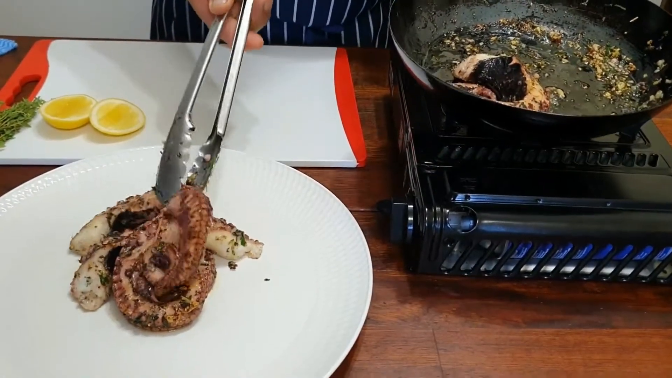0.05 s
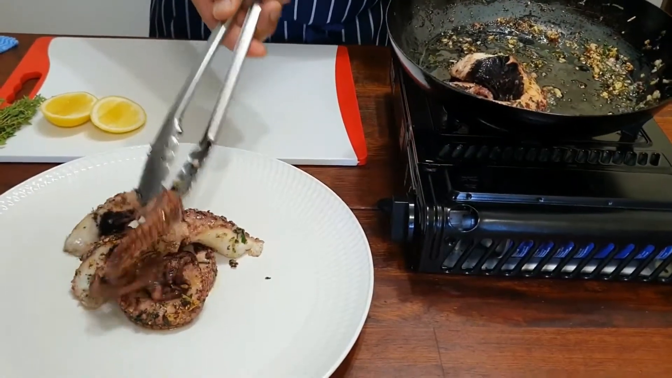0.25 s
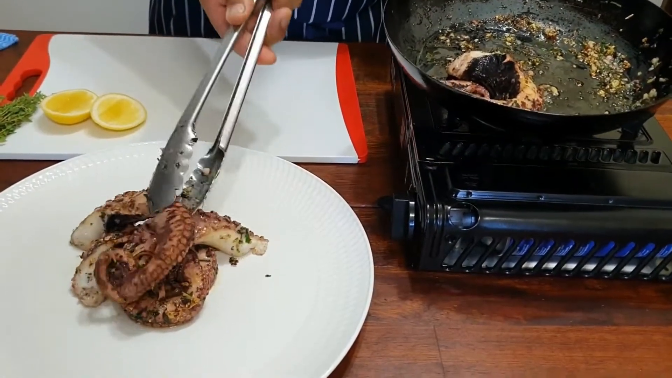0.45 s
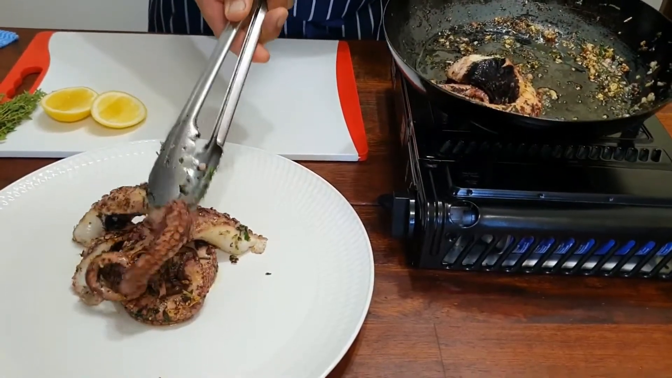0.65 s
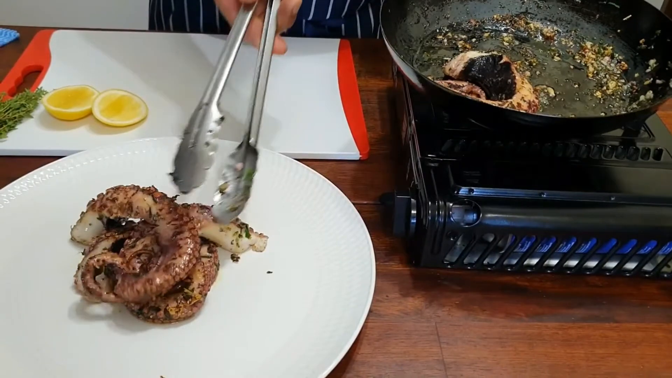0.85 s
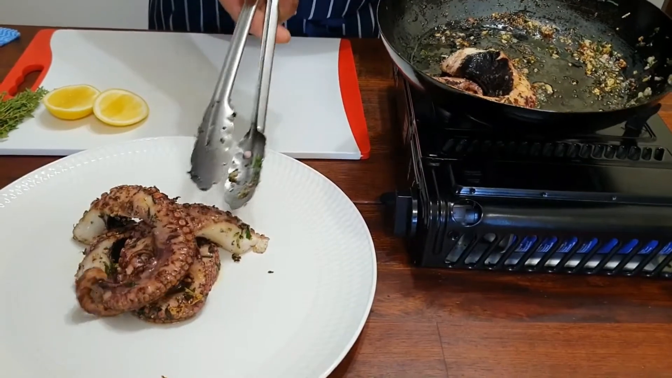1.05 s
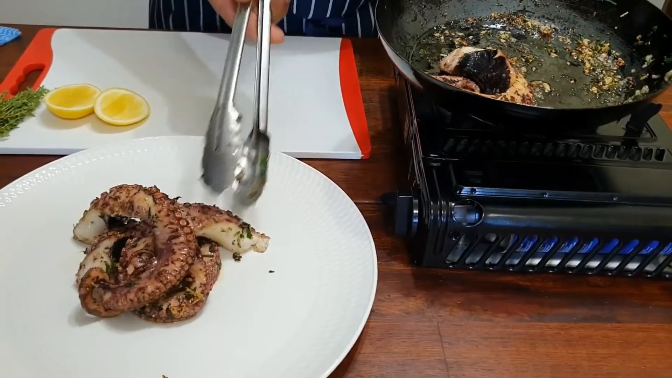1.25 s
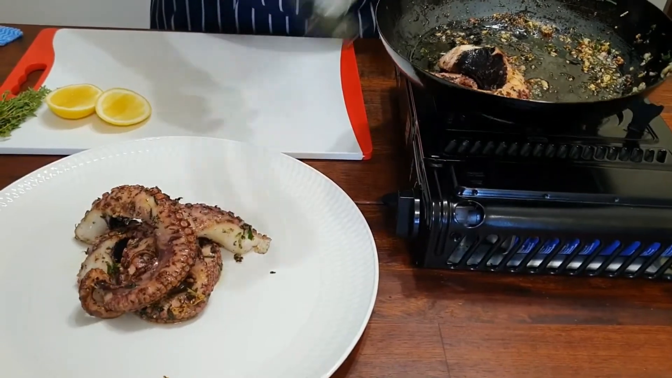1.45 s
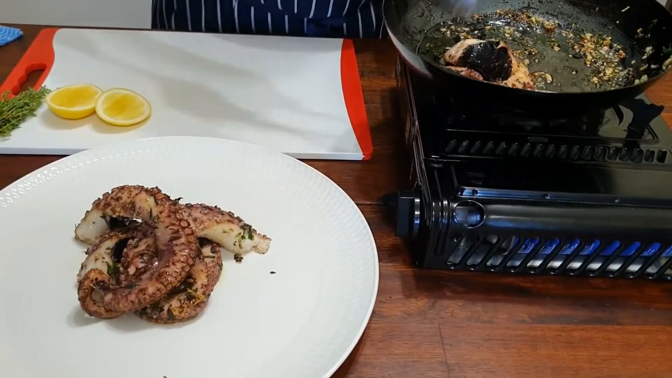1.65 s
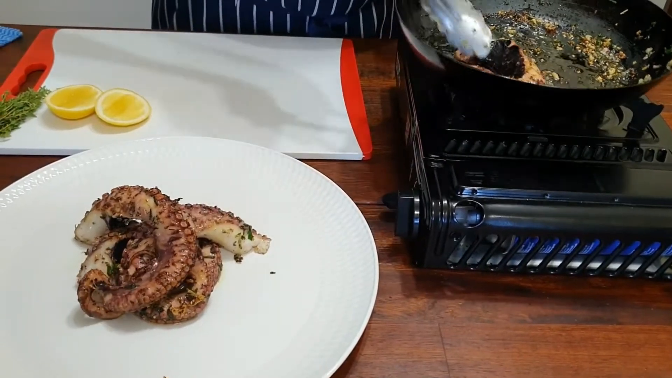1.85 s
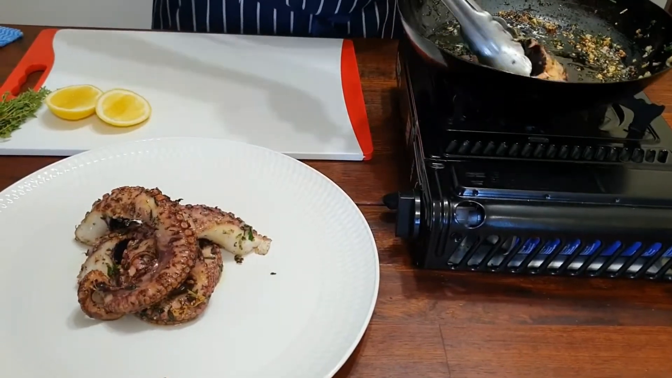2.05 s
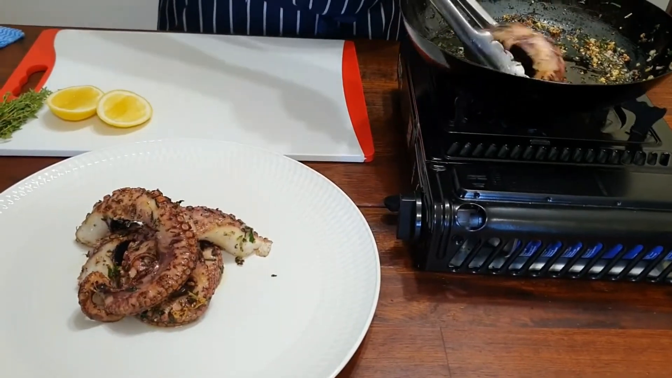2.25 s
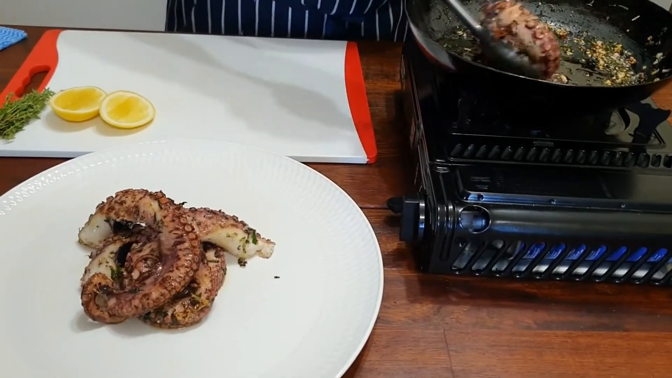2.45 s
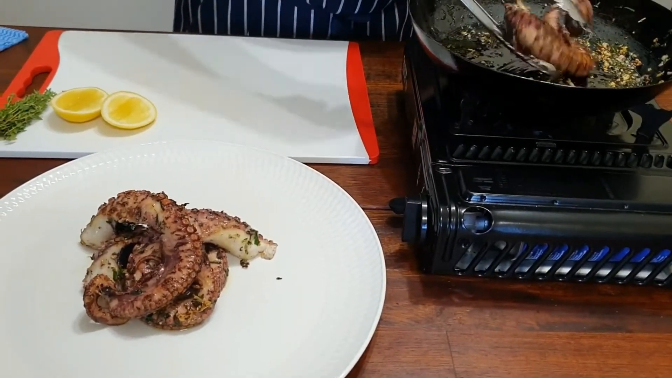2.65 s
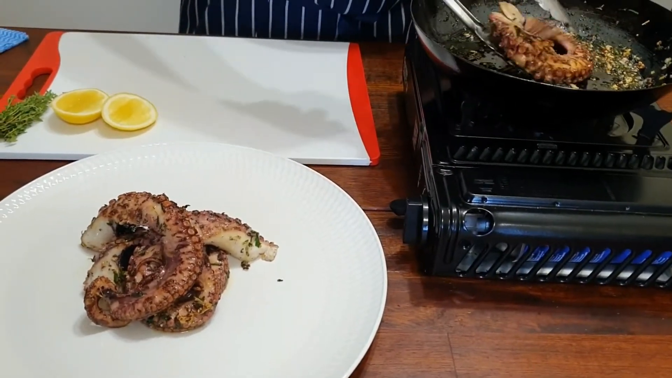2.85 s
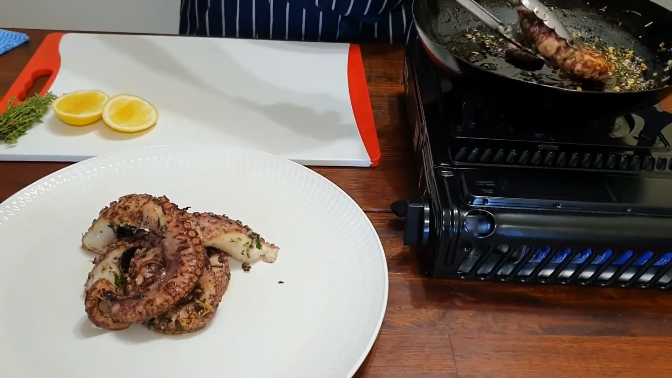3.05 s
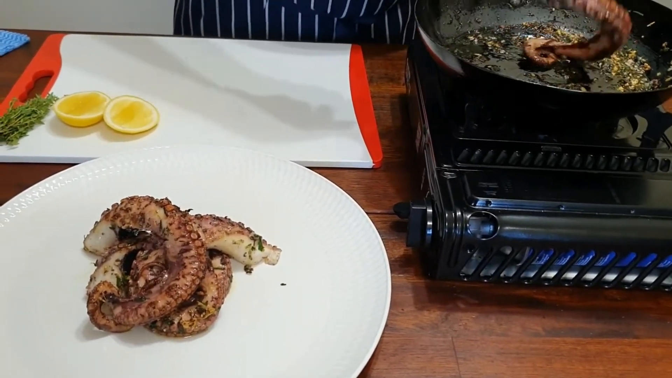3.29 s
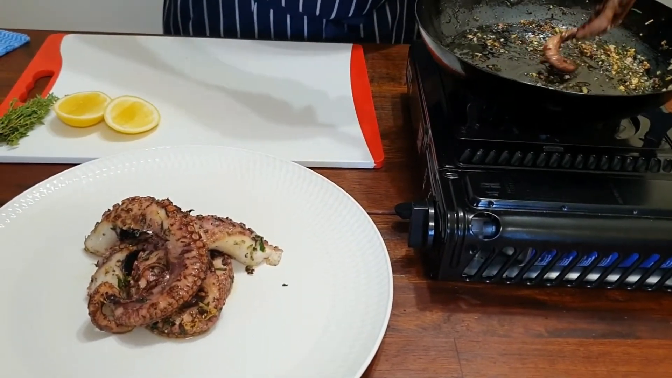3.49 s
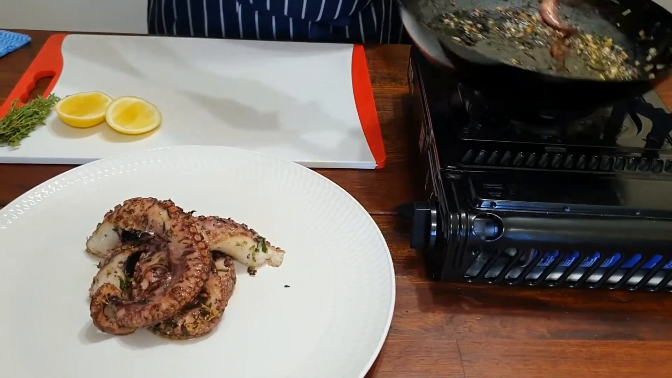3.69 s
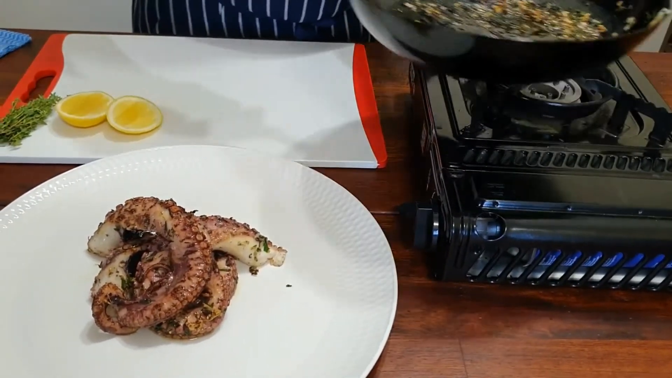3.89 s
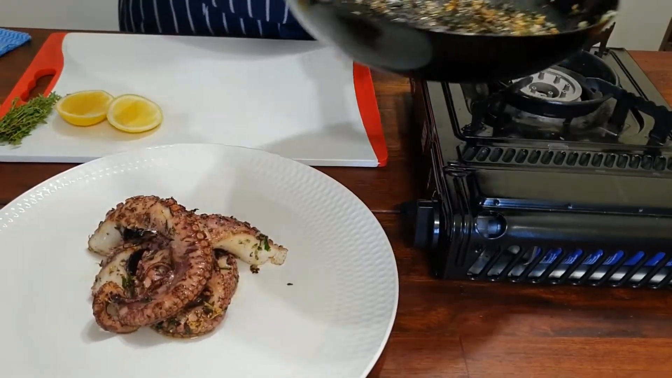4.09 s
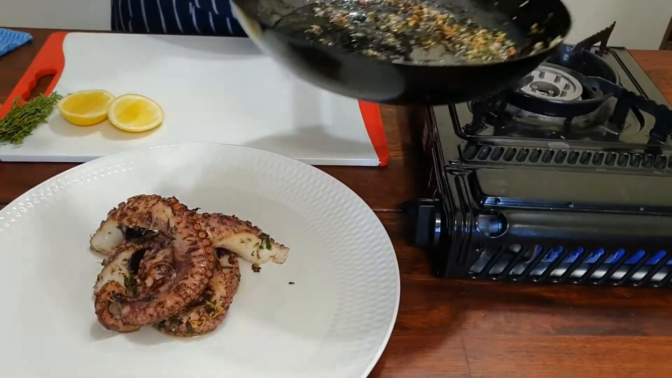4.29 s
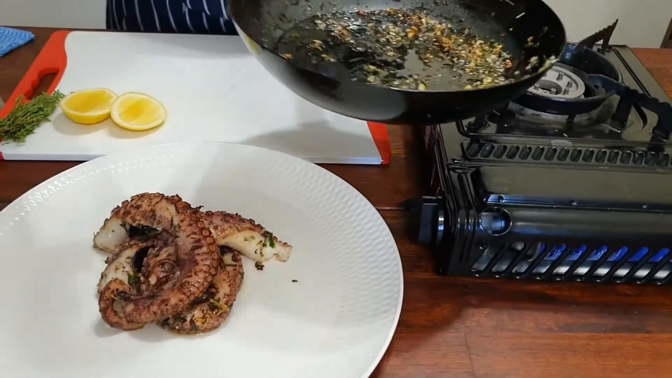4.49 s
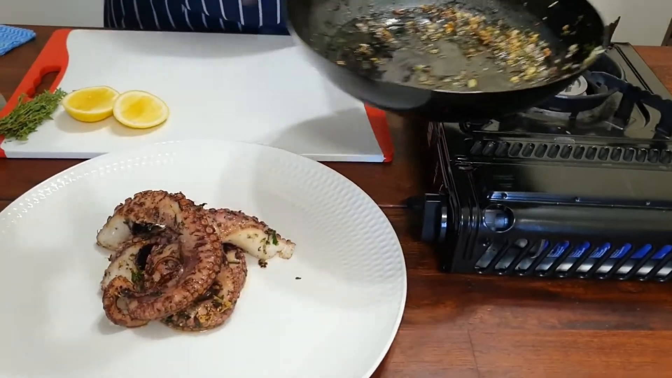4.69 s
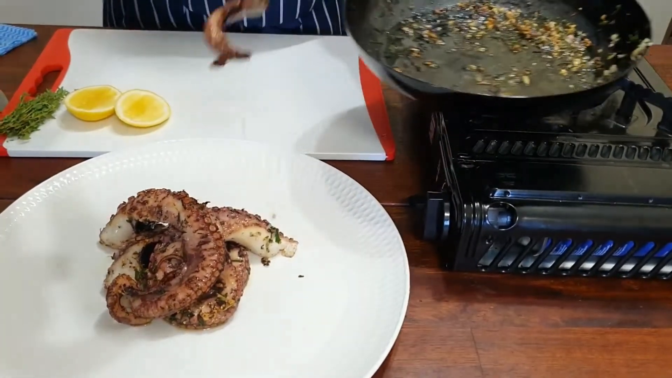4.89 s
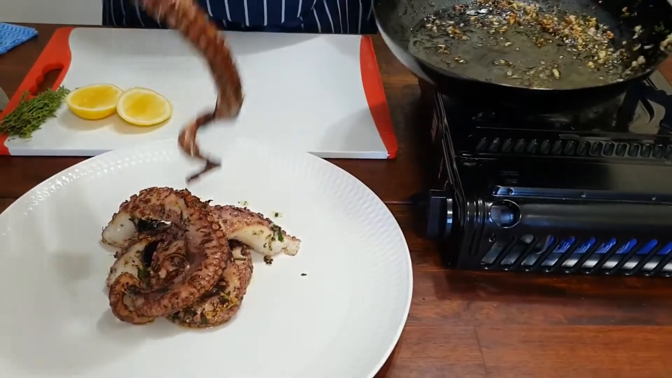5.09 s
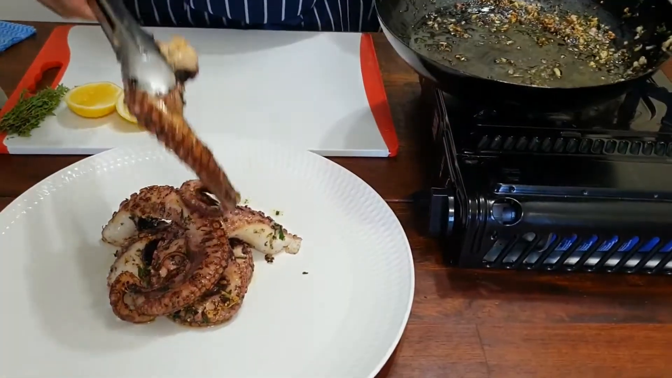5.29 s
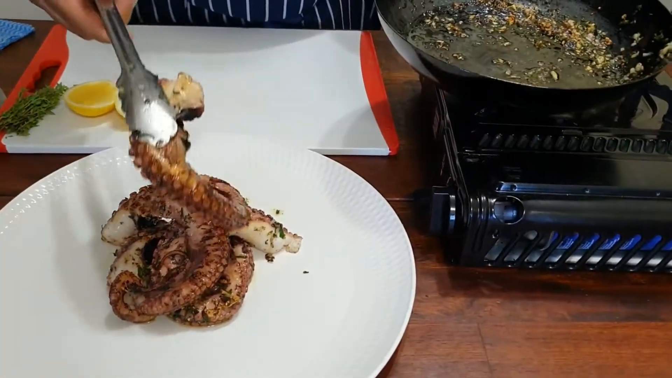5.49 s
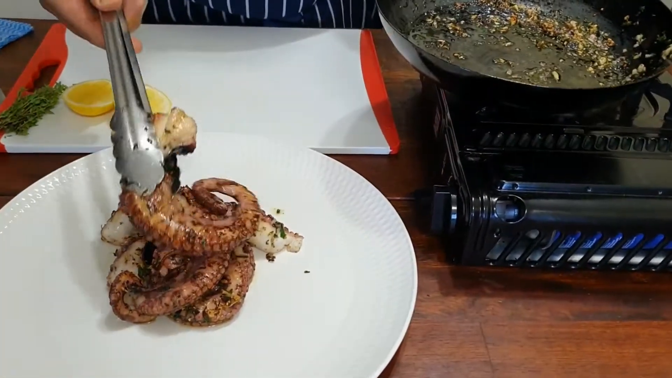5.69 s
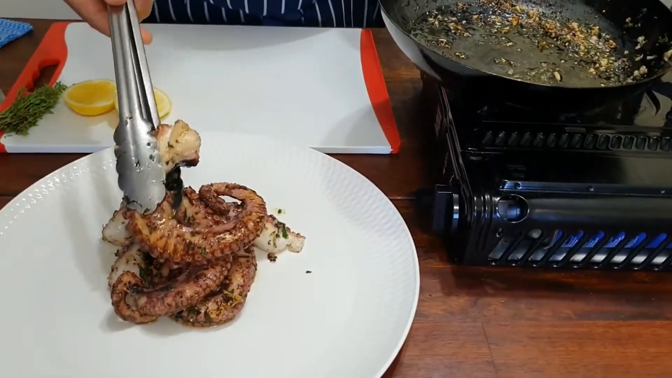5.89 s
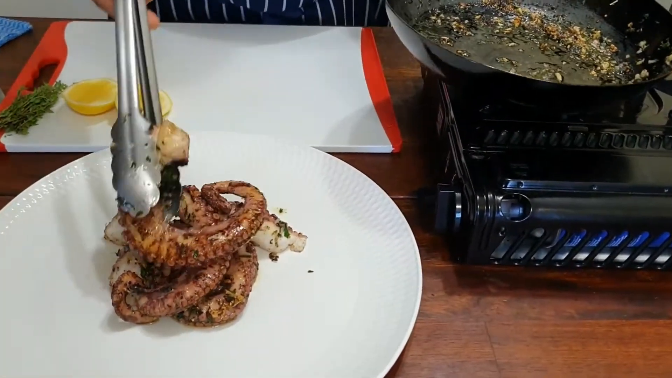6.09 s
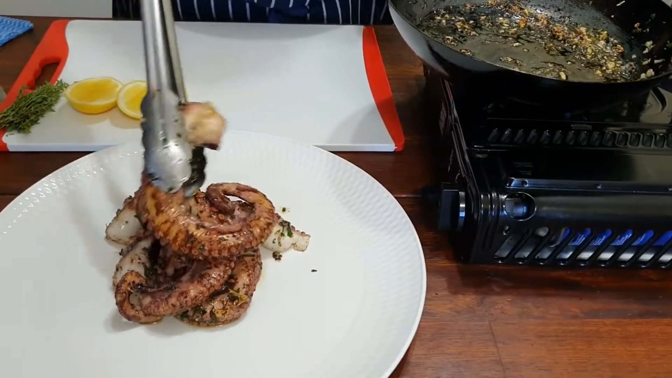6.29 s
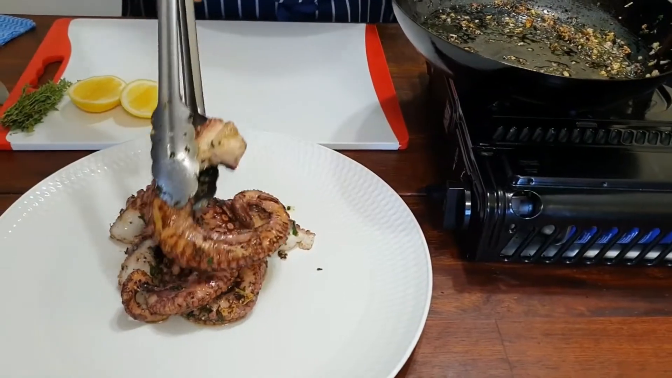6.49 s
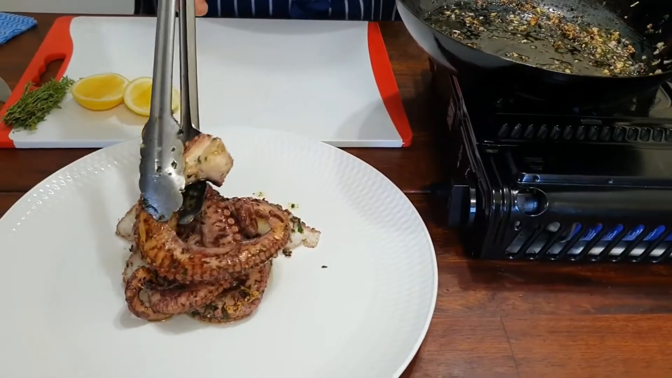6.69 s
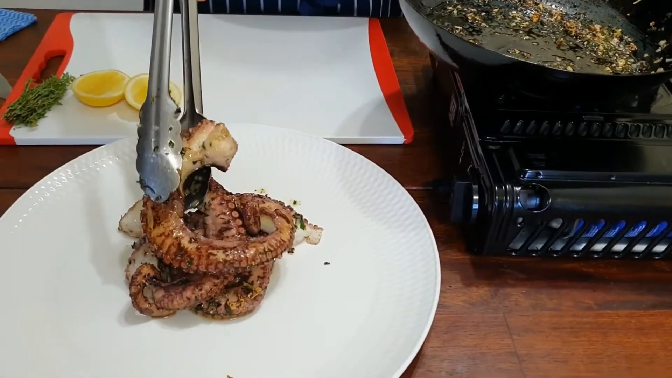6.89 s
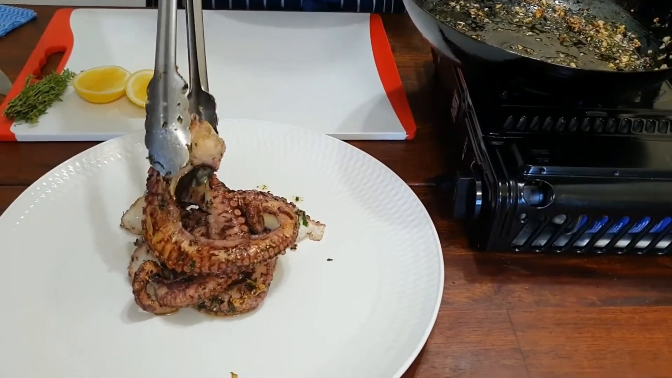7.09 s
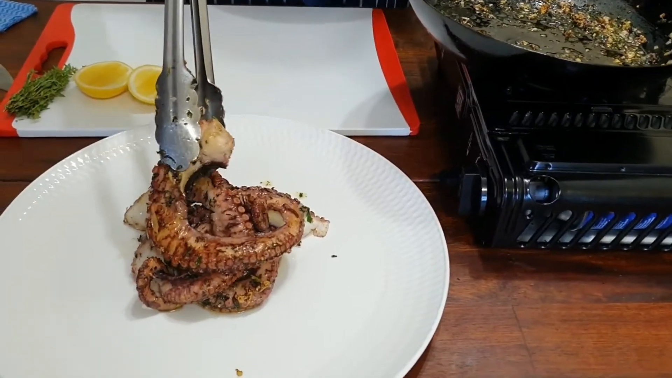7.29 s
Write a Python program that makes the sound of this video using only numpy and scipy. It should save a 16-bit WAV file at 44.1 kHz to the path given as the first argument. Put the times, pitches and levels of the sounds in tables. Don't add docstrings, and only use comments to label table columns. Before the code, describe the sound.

A close stereo pickup in a hard-walled kitchen, with soft steady air noise and a faint low engine drone that grows from about 2 s. At first almost nothing: a tiny oil spit and hiss at 0.2-0.5 s and a dull pan shift at 0.8. At 1.65 the pan tips with a muffled clunk and bounces. At 1.92-2.0 comes a bright, hard double clack of steel tongs on the pan, ringing with a deep gong, then small bounces. Scraping and faint sizzle follow to 2.4 as food is gripped. Light taps at 2.77 and tiny ticks at 3.03-3.06. At 3.63 a clunk as the pan lifts, then short scrapes near 3.75. Quiet, with faint hiss, until a loud ringing clank at 5.1 and a lesser one at 5.23, settling. A barely audible hinge squeak at 6.0, a duller rocking knock at 6.25, then soft creaks and wavering gong hum until about 7.3.

```python
import sys
import numpy as np
from scipy import signal
from scipy.fft import rfft, irfft, next_fast_len
from scipy.io import wavfile
from scipy.ndimage import uniform_filter1d

SR = 44100
rng = np.random.default_rng(int(sys.argv[2]) if len(sys.argv) > 2 else 0)


def undo_db(level):
    steps = np.asarray(level, float) / 20
    return 10 ** steps


def wrap_up_sound(samples):
    columns = np.atleast_2d(samples).T
    tamed = np.clip(columns, -1, 1)
    steps = np.round(tamed * 32767).astype(np.int16)
    wavfile.write(sys.argv[1], SR, steps)


N = 324039

# [t/s, middle/dB, gong/dB, bright/dB, thud/dB]
SPITS = [
    (.238, -68, -85, -57, -79),
    (.252, -80, -85, -78, -63),
]
# [t/s, middle/dB, gong/dB, bright/dB, thud/dB]
SHIFTS = [
    (0.82, -44.5, -68, -90, -47),
]
# [t/s, middle/dB, gong/dB, bright/dB, thud/dB]
TIPS = [
    (1.642, -44, -70, -63, -72),
    (1.648, -30, -60.5, -52, -39),
    (1.666, -35.5, -62, -72, -48),
    (1.691, -47, -67, -73, -60),
]
# [t/s, middle/dB, gong/dB, bright/dB, thud/dB]
CLACKS = [
    (1.918, -21.5, -26, -26.5, -47),
]
# [t/s, middle/dB, gong/dB, bright/dB, thud/dB]
GRAZES = [
    (1.9526, -26.5, -52, -52.5, -61),
    (1.9548, -18, -54.5, -50.5, -65),
]
# [t/s, middle/dB, gong/dB, bright/dB, thud/dB]
KNOCKS = [
    (1.9552, -19.5, -40, -43, -60),
    (1.977, -35, -47, -52, -69),
    (1.992, -34.5, -47, -49, -68),
    (2.017, -35, -53, -49, -70),
    (2.174, -47, -67, -56, -72),
]
# [t/s, middle/dB, gong/dB, bright/dB, thud/dB]
GRIPS = [
    (2.314, -41.5, -68, -41.5, -76),
    (2.321, -43.5, -51.5, -58, -76),
]
# [t/s, middle/dB, gong/dB, bright/dB, thud/dB]
TAPS = [
    (2.772, -36.5, -43.5, -49.5, -71),
    (2.778, -37.5, -56, -72, -59),
]
# [t/s, middle/dB, gong/dB, bright/dB, thud/dB]
NUDGES = [
    (3.025, -54, -73, -68, -71),
    (3.034, -45.5, -57, -76, -76),
]
# [t/s, middle/dB, gong/dB, bright/dB, thud/dB]
TICKS = [
    (3.055, -50.5, -44.5, -42.5, -71),
    (3.063, -63, -64, -46.5, -76),
]
# [t/s, middle/dB, gong/dB, bright/dB, thud/dB]
LIFTS = [
    (3.628, -31.5, -40.5, -78, -41),
]
# [t/s, middle/dB, gong/dB, bright/dB, thud/dB]
CATCHES = [
    (3.733, -48, -70, -72, -62),
    (3.744, -41, -70, -70, -62),
    (3.758, -40, -70, -70, -68),
]
# [t/s, middle/dB, gong/dB, bright/dB, thud/dB]
SETS = [
    (5.1, -21, -29, -36, -34),
    (5.103, -29, -48, -46, -55),
    (5.118, -41, -51, -56, -59),
    (5.137, -44, -60, -61, -63),
]
# [t/s, middle/dB, gong/dB, bright/dB, thud/dB]
RESETS = [
    (5.226, -30.5, -34, -44.5, -45.5),
    (5.234, -37, -56, -71, -54),
    (5.245, -40, -60, -66, -64),
    (5.359, -54, -70, -73.5, -78),
]
# [t/s, middle/dB, gong/dB, bright/dB, thud/dB]
ROCKS = [
    (6.253, -27.5, -31, -58, -40),
    (6.263, -44, -44, -72, -36),
    (6.329, -38, -60, -88, -44.5),
    (6.369, -49, -65, -93, -61),
]

# [f/Hz, level/dB, t60/s]
SHIFTED = [(735, 5.5, .1), (930, 6, .1), (1210, -27, .1), (1630, -20, .08)]
# [f/Hz, level/dB, t60/s]
TIPPED = [(750, -2.5, .3), (893, 3, .3), (1163, 2.5, .2), (1297, -2.5, .3), (1630, -3.5, .3),
          (2065, -13, .2), (2680, -10, .3), (2870, -9, .4), (3225, -20, .4), (4657, -35, .2)]
# [f/Hz, level/dB, t60/s]
TONGS = [(1030, -10, .1), (1438, -2, 0.21), (1794, 0, 0.28), (2100, -8, 0.12), (2490, 0, 0.073),
         (3250, -10, 5.0), (3740, -2, 0.037), (5539, -22, 1.8), (5740, -7, 0.31), (6460, -21, 0.13),
         (7300, -11.5, 0.065), (7370, -5, 5.0),
         (5537, -5, .3)]
# [f/Hz, level/dB, t60/s]
BOWL = [(824, -0.5, 0.029), (1010, 8, 0.026), (1755, 0, 0.048), (2350, 0.5, 0.034)]
# [f/Hz, level/dB, t60/s]
PAN = [(540, -3, .3), (819, -5, .4), (1012, 1, .8), (1222, -7, .9), (935, -3, .4), (1402, -7, .6),
       (1529, -8, .26), (1773, -7, .3), (2285, -7, .25), (2540, -8, .4), (2832, -8, .4), (3085, -12, .32),
       (3424, -16, .6), (4317, -22, .5)]
# [f/Hz, level/dB, t60/s]
DUG = [(640, -5, .2), (1012, 1, .2), (1150, 4, .2), (1222, 1, .2), (1500, -11, .2), (1900, -8, .2),
       (2540, -3, .2), (3000, -13, .2), (3520, -8, .2)]
# [f/Hz, level/dB, t60/s]
JAWS = [(1003, -11, .2), (1186, 8.5, .2), (2020, 1.5, .1), (2570, 1.5, .27), (2754, 1, .2), (5600, 2, .2),
        (6700, -10, .15), (7400, -6, .3)]
# [f/Hz, level/dB, t60/s]
WALL = [(712, -1.5, 0.34), (830, -28, 5.0), (1290, -13, 0.57), (1276, -14, 0.61), (1770, 7, 0.13),
        (1696, 0.5, 5.0), (2140, -20, 0.36), (2330, -4, 0.1), (3300, 1.5, 0.067)]
# [f/Hz, level/dB, t60/s]
FLOOR = [(645, -6, .3), (785, 2, .3), (1000, -13, .2), (1180, 7.5, .3), (1297, 5, .2), (1590, -8, .2),
         (1834, -6, .3), (3330, -10, .2)]
# [f/Hz, level/dB, t60/s]
TIPS_RING = [(1230, -2, .15), (6100, 3.5, 0.054), (7300, -2, .04), (7900, -1, .05)]
# [f/Hz, level/dB, t60/s]
LIFTED = [(664, -15, .2), (976, 5, 0.1), (1120, -4, 0.2), (1290, -6, .3), (1786, 0, 0.2), (2280, -15, 0.2)]
# [f/Hz, level/dB, t60/s]
SCRAPED = [(524, 1, .3), (725, -11, .2), (946, -3, .3), (1260, -3, .3), (1530, -2, .2), (1725, 6, .2),
           (2080, -5, .2), (2430, -13, .2), (2900, -8, .2), (4300, -16, .2)]
# [f/Hz, level/dB, t60/s]
GRATE = [(538, -6, .3), (776, 5, .22), (866, -1, .22), (929, -3, .3), (1217, -6, .4), (1314, -2, .3),
         (1655, -8, .3), (1730, -3, .25), (1870, -8, .25), (3060, -13, .3), (2505, -5, .45),
         (2826, -11, .25), (3700, -14, .2), (5480, -27, .4)]
# [f/Hz, level/dB, t60/s]
ROCKED = [(780, -14.5, 0.54), (930, 6, 0.31), (1040, -14, 0.26), (1480, -17, 0.31), (1673, -3, 0.23),
          (1830, 0, 0.032), (2110, -3, .15), (2290, -5, 0.2), (2500, -6, 0.34), (2730, -8.5, 0.096),
          (3200, -14, 0.043), (3760, -14, 0.21)]
# [f/Hz, level/dB, t60/s]
CREAKING = [(820, -1, 1.), (940, -5, .3), (1259, 0, .3), (1787, -1, .4), (2100, -12, .3), (3280, -13, .3),
            (3850, -24, .1), (4550, -22, .1), (6960, -34, .1)]
# [f/Hz, level/dB, t60/s]
GONG = [(386.5, 2, 0.82), (388, -8, 0.2)]

# [peak t/s, rise/s, fall/s, middle/dB, bright over middle/dB]
SLIDES = [
    [(1.72, 0.025, 0.034, -43, -46), (1.86, 0.14, 0.82, -51, -13.5)],
    [(2.05, 0.024, 0.16, -36, -13.5)],
    [(2.15, 0.089, 0.065, -41.5, -8), (2.21, 0.046, 0.065, -47.5, -29), (2.275, 0.053, 0.024, -44.5, -11.5),
     (2.3, 0.016, 0.023, -42.5, -14)],
    [(2.33, 0.02, 0.028, -43, -15), (2.355, .02, 0.039, -47, -17), (2.41, 0.038, 0.02, -58.5, 5.5)],
    [(2.739, 0.085, 0.12, -65, -4)],
    [(3.08, 0.04, 0.048, -45, -21), (3.12, .02, .04, -53.5, -20)],
    [(3.75, 0.08, 0.044, -43, -19.5), (3.8, 0.029, 0.05, -62, -14), (3.98, 0.13, 0.24, -69, -8)],
    [(5.285, 0.027, 0.074, -43, -45), (5.37, 0.023, 0.31, -66, -23)],
    [(6.36, 0.016, 0.06, -64, -39), (6.52, 0.075, 0.45, -61, -12), (6.64, 0.064, 0.1, -60, -8),
     (6.74, 0.079, 0.15, -63.5, -1.5), (6.9, 0.089, 0.099, -66.5, -3.5),
     (7.107, 0.061, 0.052, -61.5, -10.5), (7.18, 0.05, 0.096, -68, -4.5)],
]
SLIDE_CLEAR_DB = [-4, 0, 7, 1, -3, -2, -4, 5, 5]
# [peak t/s, rise/s, fall/s, level/dB]
SIZZLE = [
    (.27, 0.022, .08, -74),
    (.43, 0.035, 0.16, -65),
    (2.2, 0.23, .15, -54),
    (2.422, 0.058, 0.54, -62),
    (4.87, 0.12, 0.49, -63.5),
    (5.8, 0.11, 0.23, -76),
]
# [peak t/s, rise/s, fall/s, level/dB]
SWELLS = [(1.72, .03, 0.081, -57.5), (1.905, .04, 0.022, -54), (2.11, .06, 0.022, -43.5),
          (2.167, .03, 0.03, -42), (2.225, .03, 0.023, -60), (2.371, .06, 0.057, -46),
          (2.529, .05, 0.023, -63), (2.73, .04, 0.16, -59), (3.09, .05, 0.1, -62), (3.84, .06, 0.078, -61),
          (3.96, .07, 0.14, -65), (5.3, 0.081, 0.047, -52), (5.49, .09, 0.23, -65), (6.385, .03, 0.02, -59),
          (6.499, .06, 0.083, -54), (6.643, .05, 0.073, -50.5), (6.731, .05, 0.085, -55),
          (6.9, .04, 0.086, -53), (7.111, .05, 0.037, -63), (7.19, .04, 0.11, -64.5)]
# [t/s, length/s, f/Hz, width/Hz, level/dB]
SQUEAK = (6.02, 0.22, 3950, 130, -80)
# [t/s, f/Hz, level/dB]
DRONE = [(0, 75.7, -90), (1.6, 71.4, -70.5), (2.6, 70.5, -61), (2.95, 80, -63), (3.4, 76.8, -69),
         (3.7, 78.7, -59), (4.15, 76, -56), (4.45, 72.4, -63.5), (4.8, 82, -63), (5.2, 66.3, -61),
         (5.7, 83.8, -64.5), (7.35, 86, -63)]
# [f/Hz, level/dB]
AIR = [(76, -4), (130, -2), (155, -3), (172, -37), (201, -3.5), (344, -2.5), (372, -5.5), (436, -5.5),
       (637, -6), (928, -5.5), (1070, -6), (1950, -11.5), (2500, -15.5), (3310, -17.5), (13000, -25.5),
       (15000, -23)]
# [t/s, level/dB]
AIR_SWELL = [(0, 1), (.6, -0.5), (1.2, 0.5), (2.6, 3), (3.4, 4.5), (4, 1.5), (4.6, 1.5), (5.6, 0.5),
             (6.1, 1), (6.6, 6.5), (7.35, -1.5)]
# [f/Hz, likeness/1]
SAME = [(60, 1), (150, 0.87), (370, 0.84), (930, -0.11), (2330, 0.17), (5810, -0.048), (14500, 0.083)]
# [f/Hz, t60/s]
KITCHEN = [(100, 0.036), (400, 0.49), (1000, 0.37), (3000, 0.37), (8000, 0.41), (14000, 0.2)]
TABLE_LAG = (19, 31)
# [f/Hz, level/dB]
LOW_CUT = [(45, -14), (75, 10), (110, 0)]
# [f/Hz, level/dB]
RECORDER_TREBLE = [(3000, 0), (6000, -2), (8300, -2), (9000, -8.5), (10500, -5.5), (12000, -6), (14300, -10.5),
                   (14900, -28)]

LEAD = 400
SOFT_S = .0012
FLUTTER_S = 0.01195
FIRM = .3
VALLEY_DB, CLUSTER = -10, .075
TOP_HZ = 4700
WEAK_DB, TILT_DB = 16, 5


def evened(x):
    return x / np.sqrt(np.mean(x ** 2) + 1e-20)


def read(points, hz):
    f, value = np.transpose(points)
    return np.interp(np.log(hz + 1), np.log(f + 1), value)


def coloured(x, points):
    size = next_fast_len(x.shape[-1])
    gain = undo_db(read(points, np.fft.rfftfreq(size, 1 / SR)))
    return irfft(rfft(x, size) * gain, size)[..., :x.shape[-1]]


def levelled(x):
    z = rfft(x)
    fine, broad = (uniform_filter1d(abs(z) ** 2, size=bins, axis=-1) for bins in (80, 1500))
    return irfft(z * np.sqrt(broad / (fine + 1e-30)), x.shape[-1])


def resonate(x, hz, width):
    turn = np.exp(2j * np.pi * np.cumsum(hz * np.ones(x.shape[-1])) / SR)
    r = np.exp(-np.pi * width / SR)
    return 2 * (turn * signal.lfilter([1 - r], [1, -r], x / turn)).real


def add(mix, s, sound):
    part = mix[round(s * SR):][:len(sound)]
    part += sound[:len(part)]


def air():
    frames, hz = N // 256 + 5, np.fft.rfftfreq(1024, 1 / SR)
    a, b, c, d, patches = rng.standard_normal((frames, 513, 5)).T
    patches = evened(uniform_filter1d(uniform_filter1d(patches, size=12, axis=0), size=14, axis=1))
    same = np.clip(read(SAME, hz), -1, 1)[:, None]
    left = a + 1j * b
    z = np.array([left, same * left + np.sqrt(1 - same ** 2) * (c + 1j * d)])
    s, db = np.transpose(AIR_SWELL)
    swell_db = np.interp(np.arange(frames) * 256 / SR, s, db - np.mean(db))
    share = np.where(hz < 4000., 1, .35)[:, None]
    z *= undo_db(read(AIR, hz)[:, None] + .7 * patches + swell_db * share)
    return undo_db(-61.5) * evened(signal.istft(z, nperseg=1024, noverlap=768)[1][:, :N])


def rumble():
    s, engine_hz, engine_db = np.transpose(DRONE)
    t = np.arange(N) / SR
    noise = rng.standard_normal((N, 4, 2)).T
    noise[1] = noise[0] + [[.6], [.35], [.3], [.35]] * noise[1]
    lines = [(-73, 36., 46.0),  # level/dB, f/Hz, width/Hz
             (np.interp(t, s, engine_db), np.interp(t, s, engine_hz), 5.),
             (-65.5, 100., 1.5),
             (-69, 85., 40.)]
    out = np.zeros((2, N))
    for x, (db, hz, width) in zip(noise.swapaxes(0, 1), lines):
        drone = evened(resonate(resonate(x, hz, 7.1 * width), hz, width))
        drone /= (uniform_filter1d((drone ** 2).mean(0), size=9000) + 0.029) ** 0.81
        out += undo_db(db) * evened(drone)
    return out


def ring(modes, longest, spread=0., rough=0.):
    t = np.arange(SR * 3 // 4) / SR
    shift = spread * rng.uniform(-0.82, 1, len(modes))
    knots = rng.standard_normal((len(modes), 2, 200))
    out = np.zeros((2, len(t)))
    for (hz, db, t60), p, (a, b) in zip(modes, shift, knots):
        shake = np.interp(t / FLUTTER_S, np.arange(200), a + 1j * b)
        flutter = (1 + rough * shake * np.minimum(t / FLUTTER_S, 1)) / np.sqrt(1 + rough ** 2)
        tone = np.exp(2j * np.pi * hz * t) * flutter
        side = p * min(hz / 1300.0, 1) * np.array([[1], [-1]])
        out += undo_db(db - 60 * t / min(t60, longest)) * (tone.imag + side * tone.real)
    return out


def crowd(t60, low_db):
    t = np.arange(SR // 2) / SR
    decay = undo_db(-60 * t / t60)
    noise = levelled(decay * rng.standard_normal(len(t)))
    shaped = coloured(noise, [(110, low_db - 4.5), (250, low_db), (600, 0.0), (1200, 3.0),
                              (5000, -26.0), (14000, -18.5)])
    return evened(shaped) * np.sqrt(np.mean(decay ** 2))


def gathered(x, modes):
    hz = np.geomspace(400, TOP_HZ, 200)
    peaks = []
    for f, db, *_ in modes + [(TOP_HZ, -15), (hz[0], 10)]:
        weight = np.clip(1.5 + (db + TILT_DB * np.log2(f / 1000)) / WEAK_DB, 0, 1)
        peaks.append(weight / (1 + ((hz - f) / (CLUSTER * f)) ** 2))
    return coloured(x, list(zip(hz, VALLEY_DB * (1 - np.max(peaks, 0)))))


def struck(sound, hardness, rise):
    t = np.arange(sound.shape[-1]) / SR
    shaped = sound * (1 - np.exp(-t / rise)) * np.clip(10 * (t[-1] - t), 0, 1)
    return coloured(np.pad(np.atleast_2d(shaped), ((0, 0), (LEAD, LEAD))), hardness)


def blows(rows, modes, longest, clear_db, dense_t60, crack_db, top_db, gong_t60, rise=0.000063,
          free_s=1, rough=0.69):
    near, rung, t = np.zeros(N), np.zeros((N, 2)), np.arange(SR * 3 // 4) / SR
    for s, mid_db, gong_db, bright_db, thud_db in rows:
        hardness = [(1300, mid_db), (3900, (mid_db + bright_db) / 2 + 19.5),
                    (7500, bright_db + 16.5), (12500, bright_db + 10.5 + top_db)]
        noisy = crowd(dense_t60, low_db=-10.0) + undo_db(crack_db) * crowd(0.013, low_db=-31.0)
        add(near, s - LEAD / SR, struck(gathered(noisy, modes), hardness, rise)[0])

        damped = undo_db(-2000. * np.maximum(t - free_s, 0))
        clear = ring(modes, longest, spread=1.1, rough=rough) * damped
        clear = struck(clear, [(1300, mid_db), (6000, mid_db - 0.5)], rise)
        add(rung, s - LEAD / SR, undo_db(clear_db) * clear.T)

        gong = ring(GONG, gong_t60) * (1 - np.exp(-t / 0.05)) * np.clip(10 * (t[-1] - t), 0, 1)
        add(rung, s, undo_db(gong_db) * gong.T)

        push = coloured(rng.standard_normal(len(t)), [(45, -31), (85, -1.5), (300, 1.5), (500, 3.5),
                                                      (900, -36.5)])
        add(near, s, undo_db(thud_db + 2.5 - 60 * t / 0.076) * evened(push) * (1 - np.exp(-t / 0.0068)))
    return near, rung


def stroke(rise, fall, bend=1.):
    t = np.arange(-rise, fall, 1 / SR)
    ends_db = -20
    push = undo_db(ends_db * np.maximum(-t / rise, t / fall) ** bend)
    return t, push * signal.windows.tukey(len(t), .2)


def sizzle(peak, rise, fall, db):
    t, push = stroke(rise, fall)
    pops = rng.standard_normal((2, SR)) * undo_db(2. * rng.exponential(1, (2, SR)))
    hiss = evened(coloured(pops[:, :len(t)], [(2000, -5), (5000, 2), (10000, 1.0), (12000, 6), (15000, 5.5)]))
    return peak - rise, (undo_db(db) * push * hiss).T


def swell(peak, rise, fall, db):
    t, push = stroke(rise, fall, bend=1.2)
    wander = evened(uniform_filter1d(rng.standard_normal(SR), size=3000))[:len(t)]
    tone = np.sqrt(2) * np.sin(2 * np.pi * np.cumsum(387. + 1.3 * wander) / SR)
    return peak - rise, undo_db(db) * tone[:, None] * push[:, None]


def slide(modes, clear_db, peak, rise, fall, mid_db, bright_db):
    t, push = stroke(rise, fall)
    slips = rng.standard_normal(SR) * undo_db(1.47 * rng.exponential(1, SR))
    slips = (slips * (rng.random(SR) < 1500. / SR))[:len(t)]
    clear = evened(ring(modes, 0.063)[0, :SR // 2])
    dense = evened(gathered(crowd(0.017, low_db=-45.0), modes))
    heard, hissed = (signal.fftconvolve(slips, undo_db(db) * clear + dense)[:len(t)]
                     for db in (clear_db, clear_db - 11))
    dull = evened(coloured(heard, [(3400, 1), (4000, -15.0)]))
    sharp = evened(coloured(hissed, [(2500, -28.0), (3400, 14.0), (8000, 13.0), (13000, -14.0)]))
    return peak - rise, undo_db(mid_db - 1.5) * (dull + undo_db(bright_db) * sharp) * push


def squeak():
    s, length, hz, width, db = SQUEAK
    out, rub = np.zeros(N), rng.standard_normal(SR // 2)[:round(length * SR)]
    whistle = evened(resonate(resonate(rub, hz, width), hz, width))
    add(out, s, undo_db(db) * whistle * signal.windows.tukey(len(rub), .5))
    return out


def kitchen(x):
    taps = np.zeros((2, SR // 2))
    at = np.arange(120, SR // 2 - 20, 20) + rng.integers(0, 20, (2, (SR // 2 - 121) // 20))
    np.put_along_axis(taps, at, rng.choice([-1., 1.], at.shape), 1)
    hz, t, z = signal.stft(taps, SR, nperseg=256)
    same = np.clip(read(SAME, hz), -1, 1)[:, None]
    z[1] = same * z[0] + np.sqrt(1 - same ** 2) * z[1]
    tail = signal.istft(z * undo_db(-60 * t / read(KITCHEN, hz)[:, None]), SR, nperseg=256)[1]
    tail = levelled(tail)
    return signal.fftconvolve(x[None], tail / np.linalg.norm(tail[0]), axes=1)[:, :N]


def starved(x):
    starved_hz, starved_db = 8700, 34.5
    hz, t, z = signal.stft(x, SR, nperseg=1024)
    power = (abs(z) ** 2).mean(0)
    middle = power[(hz > 300) & (hz < 4000)].sum(0)
    over_db = 10 * np.log10(middle / power[hz > starved_hz].sum(0))
    z[:, hz > starved_hz] *= undo_db(-40 * np.clip((over_db - starved_db) / 2, 0, 1))
    return signal.istft(z, SR, nperseg=1024)[1][:, :N]


def scene():
    hits = [
        blows(SPITS, FLOOR, longest=.1, clear_db=-28.0, dense_t60=0.0088, crack_db=0.0, top_db=18.5,
              gong_t60=.1, rise=0.00033),
        blows(SHIFTS, SHIFTED, longest=0.069, clear_db=-9.0, dense_t60=0.06, crack_db=9.0, top_db=-10.,
              gong_t60=.1, rise=0.00069),
        blows(TIPS, TIPPED, longest=0.057, clear_db=-6.5, dense_t60=0.052, crack_db=13.5, top_db=-15.0,
              gong_t60=0.1, rise=SOFT_S),
        blows(CLACKS, TONGS, longest=0.27, clear_db=-7.0, dense_t60=0.095, crack_db=-5.5, top_db=2.5,
              gong_t60=0.6, rise=0.00012, free_s=0.04),
        blows(GRAZES, BOWL, longest=0.2, clear_db=-1.5, dense_t60=0.0036, crack_db=-5.0, top_db=-5.5,
              gong_t60=0.18, rise=0.0003, rough=0.16),
        blows(KNOCKS, PAN, longest=0.36, clear_db=-10.5, dense_t60=0.14, crack_db=10.5, top_db=-5.0,
              gong_t60=0.51, rise=0.0002, rough=FIRM),
        blows(GRIPS, JAWS, longest=0.056, clear_db=0.0, dense_t60=0.11, crack_db=6.0, top_db=-4.0,
              gong_t60=0.63, rise=0.00054),
        blows(TAPS, WALL, longest=0.24, clear_db=-11.5, dense_t60=0.066, crack_db=13.5, top_db=-15.0,
              gong_t60=0.35, rise=2 * SOFT_S),
        blows(NUDGES, FLOOR, longest=0.066, clear_db=-8.0, dense_t60=0.043, crack_db=6.0, top_db=-6.,
              gong_t60=.3, rise=2 * SOFT_S),
        blows(TICKS, TIPS_RING, longest=0.1, clear_db=3.5, dense_t60=0.014, crack_db=7.5, top_db=-9.0,
              gong_t60=0.16),
        blows(LIFTS, LIFTED, longest=0.072, clear_db=-22.0, dense_t60=0.053, crack_db=-2.5, top_db=-13.0,
              gong_t60=0.6, rise=SOFT_S),
        blows(CATCHES, SCRAPED, longest=0.06, clear_db=-3.0, dense_t60=0.053, crack_db=14.5, top_db=-24.5,
              gong_t60=.1, rise=2 * SOFT_S),
        blows(SETS, GRATE, longest=0.42, clear_db=-11.5, dense_t60=0.026, crack_db=9.5, top_db=-10.5,
              gong_t60=0.52, rise=SOFT_S, rough=FIRM),
        blows(RESETS, GRATE, longest=0.24, clear_db=-8.5, dense_t60=0.03, crack_db=8.0, top_db=-10.0,
              gong_t60=0.44, rise=SOFT_S / 2, rough=FIRM),
        blows(ROCKS, ROCKED, longest=0.041, clear_db=-10.0, dense_t60=0.042, crack_db=-21.0, top_db=-12.0,
              gong_t60=0.28, rise=2 * SOFT_S, rough=2 * FIRM)]
    near, rung = (sum(part) for part in zip(*hits))

    slid = np.zeros(N)
    slide_modes = [TIPPED, PAN, DUG, JAWS, WALL, FLOOR, SCRAPED, GRATE, CREAKING]
    for rows, clear_db, modes in zip(SLIDES, SLIDE_CLEAR_DB, slide_modes):
        for row in rows:
            add(slid, *slide(modes, clear_db, *row))
    for row in SWELLS:
        add(rung, *swell(*row))
    for row in SIZZLE:
        add(rung, *sizzle(*row))

    sent = near + undo_db(-1) * slid
    near = near + undo_db(2.0) * slid
    left_lag = 8
    direct = np.array([np.roll(near, left_lag), near]) * undo_db([[-1.5], [-.5]])
    direct += undo_db(-74.0) * np.array([np.roll(near, lag) for lag in TABLE_LAG])
    metal = coloured(direct + kitchen(sent) + rung.T, LOW_CUT)
    return metal + air() + rumble() + squeak()


def low_pass(x):
    return signal.sosfilt(signal.butter(12, 15110, fs=SR, output="sos"), x)


def record(dry):
    mix = starved(coloured(dry, RECORDER_TREBLE))
    return low_pass(mix)


dry = scene()
out = record(dry)
wrap_up_sound(out)
```